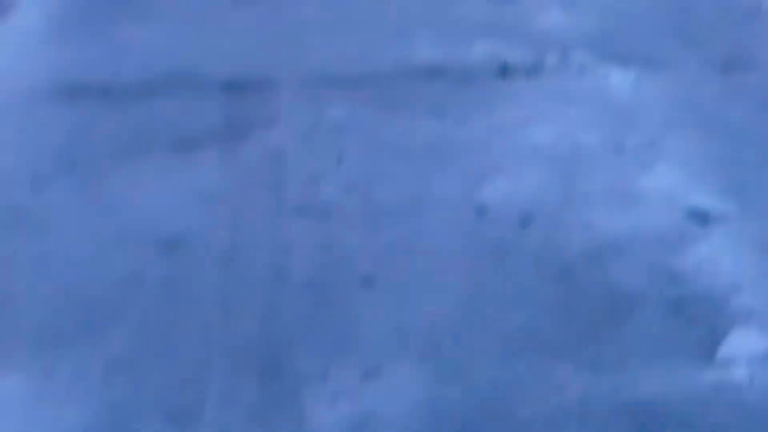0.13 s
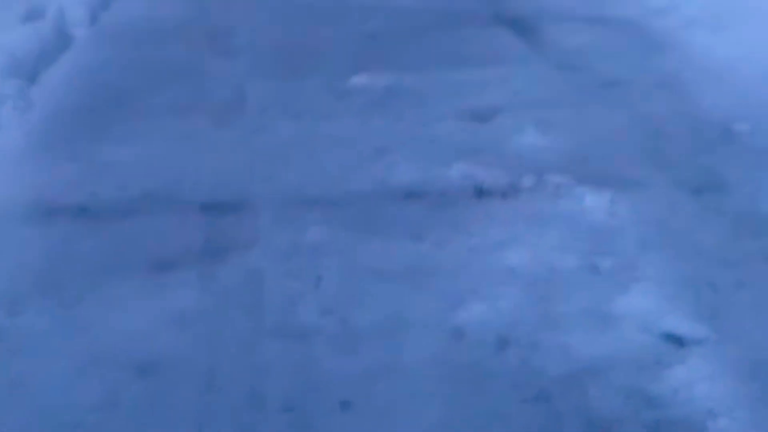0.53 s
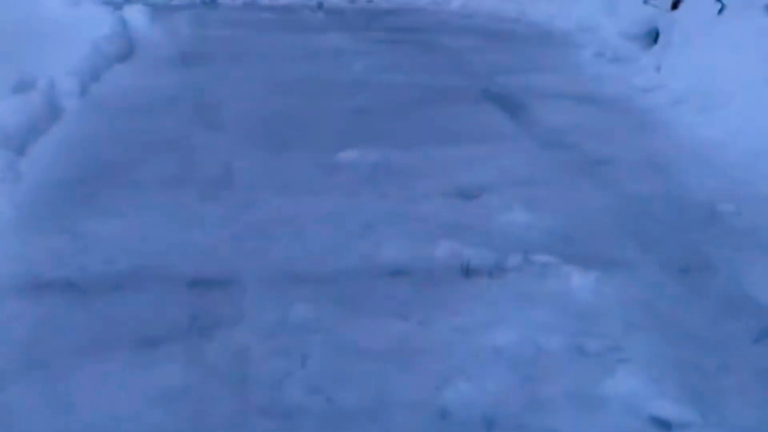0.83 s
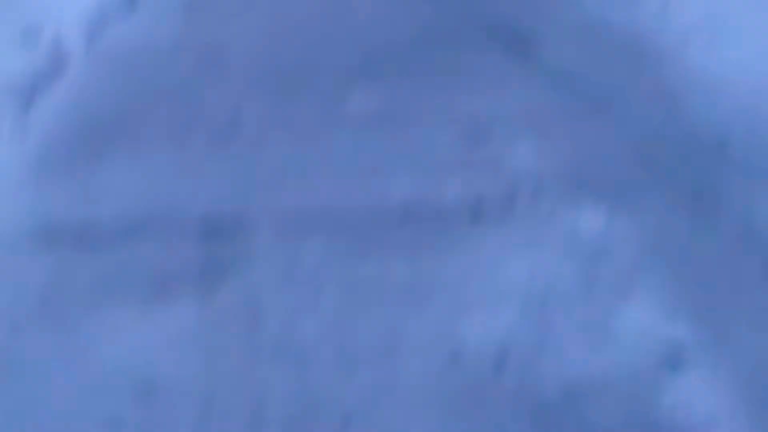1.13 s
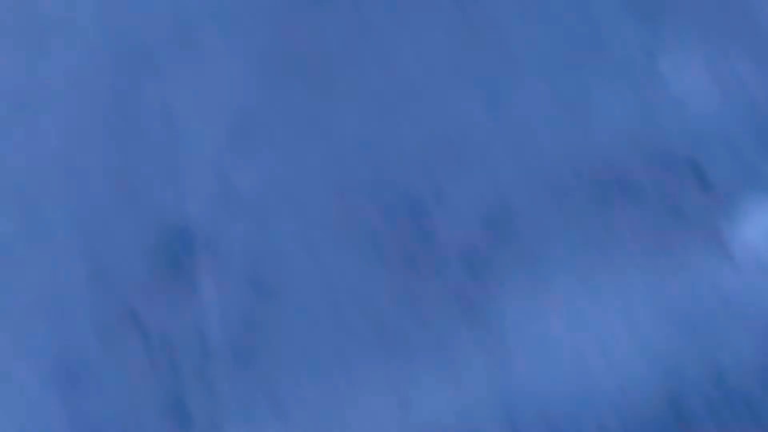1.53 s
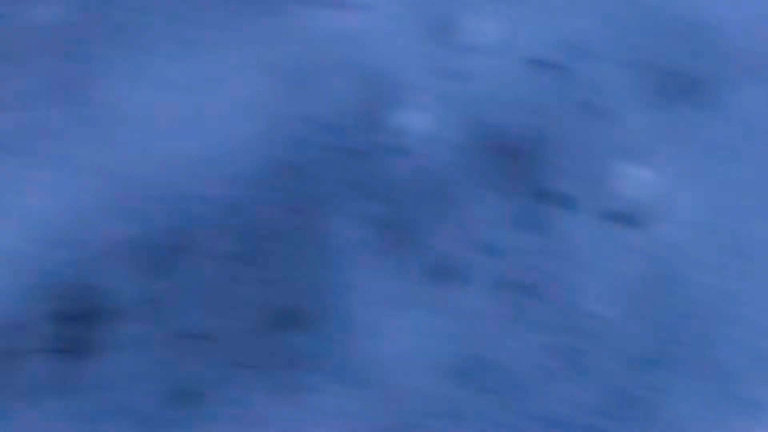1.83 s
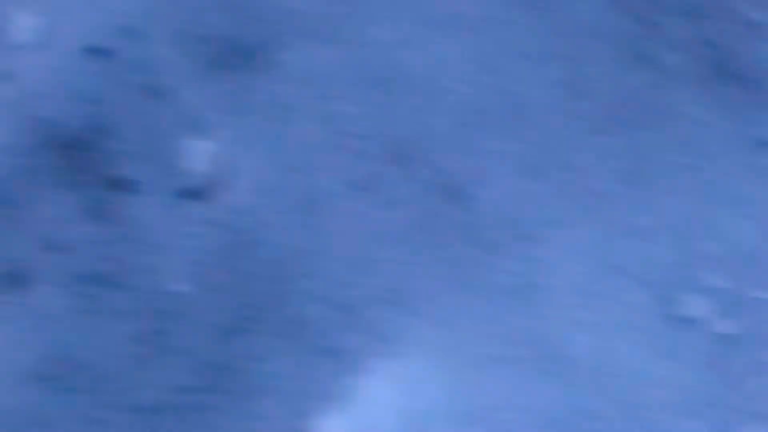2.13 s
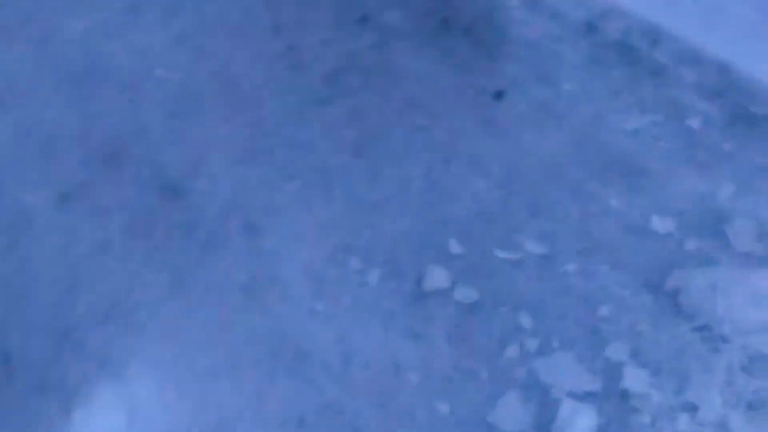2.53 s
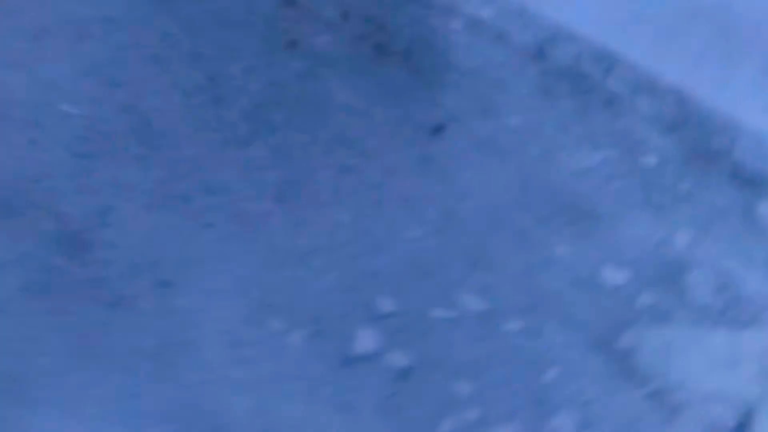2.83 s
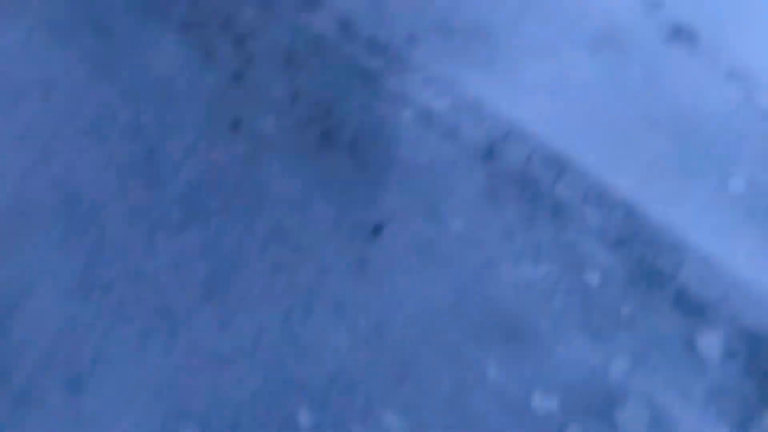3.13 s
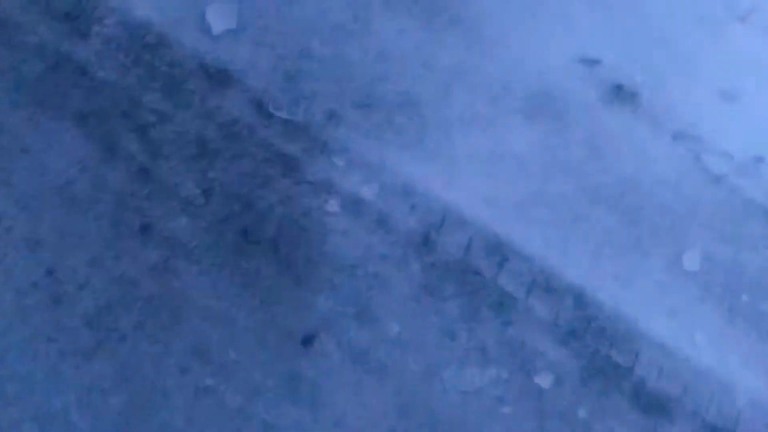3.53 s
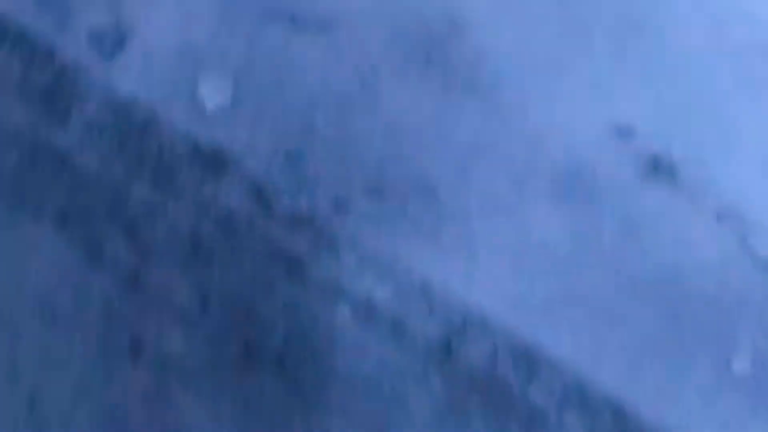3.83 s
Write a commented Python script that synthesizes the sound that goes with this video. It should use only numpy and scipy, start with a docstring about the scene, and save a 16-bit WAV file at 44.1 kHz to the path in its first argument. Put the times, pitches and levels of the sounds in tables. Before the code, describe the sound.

Boots tread on a frozen outdoor path, the crust crackling and crunching underfoot. After a few quiet crackles the steps build, ending with two loud, close cracks. A faint hiss and a few tiny bird chirps sit behind.

```python
"""Footsteps on crusted ice

Boots tread on ice outdoors, ever closer. Each crack launches bending waves in the sheet; these are dispersive,
treble outrunning bass, so it arrives as a tiny falling chirp with a spray of splinters. Crumbs crunch under the
weight, soles scuff and some cracks trail off in a low, falling knock. Small birds call over a faint hiss."""
import sys
import numpy as np
from scipy import signal
from scipy.fft import rfft, irfft, next_fast_len
from scipy.io import wavfile
from scipy.ndimage import map_coordinates

SR = 44100
rng = np.random.default_rng(int(sys.argv[2]) if len(sys.argv) > 2 else 0)


def wrap_up_sound(samples):
    """Save the sound to the file named by the first command line argument, as 16-bit audio."""
    columns = np.atleast_2d(samples).T
    # keep every value between -1 and 1, then stretch to whole-number steps
    tamed = np.clip(columns, -1, 1)
    steps = np.round(tamed * 32767).astype(np.int16)
    wavfile.write(sys.argv[1], SR, steps)


N = 176400
T = np.arange(N) / SR
BURST = 2048  # samples in one short event
LAG_S, ARRIVAL_S = .0047, .0016  # at 1 kHz: travel time through the ice; arrival after a listed time
CLUMPS_PER_S = 220


def amp(db):
    """Decibels expressed as an amplitude ratio."""
    return 10 ** (np.asarray(db) / 20)


def unit(x):
    """Normalisation to an RMS of one."""
    return x / np.sqrt(np.mean(x ** 2) + 1e-20)


def sized(x, seconds):
    """A burst with the energy of so many seconds at unit level."""
    return x / np.linalg.norm(x) * np.sqrt(seconds * SR)


def gain(points, hz):
    """A magnitude response: (Hz, dB) points interpolated in log frequency."""
    f, db = np.transpose(points)
    return amp(np.interp(np.log(hz + 1e-6), np.log(f), db))


def bell(f, hz, width_oct):
    """A resonance peak, Gaussian in log frequency."""
    return np.exp(-.5 * (np.log2((f + 1) / hz) / width_oct) ** 2)


def filtered(x, response):
    """Linear filtering: the spectrum of x times a complex frequency response."""
    m = next_fast_len(2 * len(x))
    return irfft(rfft(x, m) * response(np.fft.rfftfreq(m, 1 / SR)), m)[:len(x)]


def wobble(per_s):
    """Random modulation: a smooth curve through per_s Gaussian values a second."""
    return map_coordinates(rng.standard_normal(int(N * per_s / SR) + 4), [T * per_s])


def add(out, start, x):
    """Superposition of x on out from a start in seconds."""
    i = max(round(start * SR), 0)
    out[i:i + len(x)] += x[:max(N - i, 0)]


def swell(t, length, rise, fall):
    """An envelope with linear attack, hold and exponential decay; times in seconds."""
    return np.clip(t / rise, 0, 1) * np.exp(-np.maximum(t - length, 0) / fall)


def bending(hz, lag_s):
    """Dispersion of bending waves: group delay, lag_s at 1 kHz, goes as one over root frequency."""
    return np.exp(-4j * np.pi * lag_s * np.sqrt(1000 * hz))


def fractures(per_s):
    """A Poisson process of tiny breaks: impulses of uneven size, the strong ones in clumps."""
    size_db = 4 * np.clip(rng.standard_normal(N), -2, 2) + 1.5 * wobble(CLUMPS_PER_S)
    return (rng.random(N) < per_s / SR) * rng.choice([-1, 1], N) * amp(size_db)


def grains(per_s, spectrum):
    """Many tiny fractures, dispersed by their passage through the ice, at unit level."""
    return unit(filtered(fractures(per_s), lambda f: gain(spectrum, f) * bending(f, LAG_S)))


def echo(x, t60_s):
    """Diffuse reflection from the surroundings: convolution with exponentially decaying noise."""
    t = T[:SR]
    tail = rng.standard_normal(SR) * amp(-60 * t / t60_s) * (1 - np.exp(-t / .01))
    return signal.fftconvolve(x, tail / np.linalg.norm(tail))[:N]


def air():
    """Ambient noise: a faint broadband rumble and hiss whose level wavers slightly."""
    # Each row: frequency in Hz, relative level in dB.
    spectrum = [(25, -26.5), (48, -1.5), (90, 1), (170, -1.5), (300, -6.5), (600, -14.5), (1200, -20.5),
                (2500, -29), (3300, -13.5), (4600, -18.5), (6000, -35), (9000, -36.5), (16000, -40.5)]
    level = amp(-64.5 + .49 * wobble(per_s=5.2))
    return level * unit(filtered(rng.standard_normal(N), lambda f: gain(spectrum, f)))


def birds():
    """Short frequency-modulated whistles; scattering by branches makes them flutter."""
    # Each row: start and length in seconds, first and last pitch in Hz, direct level in dB.
    notes = [(0.811, 0.06, 5620, 7630, -63.5), (0.851, 0.038, 5570, 8020, -55.5),
             (.0, 0.049, 2040, 1820, -67), (0.186, 0.088, 4080, 3580, -79), (0.61, 0.062, 4420, 3740, -70),
             (.665, 0.048, 3350, 3080, -73), (1.258, 0.04, 4660, 3740, -65.5),
             (1.297, 0.05, 3850, 3070, -60.5), (1.543, 0.085, 5350, 4930, -68),
             (2.105, 0.066, 3000, 3380, -60), (3.075, 0.067, 4200, 3950, -61),
             (3.146, 0.035, 3590, 3170, -57.5), (1.285, 0.0282, 2960, 3780, -63.5)]
    direct, far = np.zeros(N), np.zeros(N)
    warble = 1 + .017 * wobble(per_s=250)
    for start, length, first_hz, last_hz, db in notes:
        progress = np.clip((T - start) / length, 0, 1)
        hz = first_hz * (last_hz / first_hz) ** progress * warble
        note = np.sqrt(2) * np.sin(np.pi * progress) * np.sin(2 * np.pi * np.cumsum(hz) / SR)
        direct += amp(db) * note
        far += amp(-66.5) * note  # the diffuse field is equally loud for near and far birds
    flutter = unit(amp(3.5 * wobble(per_s=200)))
    return direct * flutter + echo(far, t60_s=.44)


def thumps():
    """A damped impact: weight landing on the heel gives a dull pulse of low noise."""
    # Each row: start in seconds, level in dB.
    landings = [(1.892, -52.5), (2.953, -50), (3.803, -70)]
    # Each row: frequency in Hz, relative level in dB.
    spectrum = [(20, -9.5), (55, 2.5), (110, 3.5), (250, -27.5), (800, -43)]
    weight = sum(amp(db) * swell(T - start, 0, rise=.002, fall=.041) for start, db in landings)
    return weight * unit(filtered(rng.standard_normal(N), lambda f: gain(spectrum, f)))


def chips():
    """Free vibration: chips snap off at random, each a damped sinusoid with a pitch of its own."""
    per_s, centre_hz, spread_oct, spread_db, decay_cycles = 260, 4550, .55, 5, 1.6
    when, size, pitch = rng.random((int(per_s * N / SR), 3)).T
    hz = centre_hz * 2 ** (spread_oct * np.sqrt(3) * (2 * pitch - 1))
    cycles = hz[:, None] * T[:BURST // 8]
    level = amp(-spread_db * np.log(size + .03))
    pings = level[:, None] * np.sin(2 * np.pi * cycles) * np.exp(-cycles / decay_cycles)
    samples = (when * N).astype(int)[:, None] + np.arange(cycles.shape[1])
    return unit(np.bincount(samples.ravel(), pings.ravel(), N)[:N])


def scuff():
    """Sliding friction: the sole rolls crumbs, hisses over frost and, under pressure, breaks off chips."""
    # Each row: time in seconds, crumb level in dB, hiss level in dB.
    slide = [(0, -70, -65.5), (.2, -83, -70.5), (1.1, -84, -70), (1.5, -68.5, -61.5), (1.8, -60, -60.5),
             (2.0, -67, -62), (2.29, -62, -61.5), (2.34, -44, -53), (2.45, -62, -58), (2.6, -56, -55),
             (2.92, -49, -52.5), (3.08, -51, -59), (3.14, -62.5, -56), (3.22, -53.5, -56),
             (3.35, -65, -63.5), (3.49, -74.5, -64), (3.67, -58, -61.5), (3.75, -63, -55), (4, -51, -58.5)]
    # Each row of both spectra: frequency in Hz, relative level in dB.
    crumb_spectrum = [(60, -22), (200, -2.5), (400, -5.5), (700, -2), (1200, -6), (2000, -10), (3500, -23),
                      (9000, -41)]
    hiss_spectrum = [(500, -7), (1400, 1.5), (2400, -0.5), (4000, 2.5), (5500, -0.5), (7000, -5.5),
                     (10000, -11.5), (16000, -14)]
    bite_db = -50.5  # hiss level at which the sole chips as loudly as it slides
    times, *levels_db = np.transpose(slide)
    crumb, hiss = [amp(np.interp(T, times, db)) for db in levels_db]
    frost = fractures(per_s=7000) * amp(1.06 * wobble(CLUMPS_PER_S))
    treble = unit(filtered(frost, lambda f: gain(hiss_spectrum, f))) + hiss / amp(bite_db) * chips()
    return crumb * grains(per_s=500, spectrum=crumb_spectrum) + hiss * treble


def rasps():
    """Resonance excited by friction: a hard edge scrapes briefly across the ice and rings a shard."""
    # Each row: start and length in seconds, level in dB, resonance in Hz, its boost in dB.
    scrapes = [(0.098, 0.0054, -39, 2570, 15), (2.49, 0.01, -32.5, 6930, 12),
               (2.6605, 0.0032, -29.5, 3660, 10.5), (3.014, 0.0066, -34.5, 6500, 10),
               (3.127, .004, -50, 10500, 14), (3.583, 0.0022, -31.5, 2930, 21),
               (3.834, 0.01, -26.5, 1370, 25)]
    # Each row: frequency in Hz, relative level in dB.
    spectrum = [(300, -0.5), (1300, 4), (3000, -1), (7000, -3.5), (11000, -10.5), (16000, -18.5)]
    out, t = np.zeros(N), T[:BURST]
    for start, length, db, hz, ring_db in scrapes:
        colour = lambda f: gain(spectrum, f) * amp(ring_db * bell(f, hz, width_oct=.34))
        scrape = unit(filtered(rng.standard_normal(BURST), colour))
        add(out, start, amp(db) * scrape * swell(t, length, rise=.0015, fall=.0025))
    return out


def crunch():
    """Brittle failure: coarse crumbs, fine grit and chips break off as the crust yields to the boot."""
    # Each row: start and length in seconds, relative crumb and grit levels in dB.
    collapses = [(0.086, 0.034, -53, -54.5), (0.402, 0.026, -65.5, -61.5), (1.622, 0.037, -54.5, -53.5),
                 (1.867, 0.031, -45, -46), (1.895, 0.04, -53.5, -48), (2.318, 0.031, -41.5, -47.5),
                 (2.362, 0.055, -46, -50.5), (2.426, 0.047, -50.5, -57), (2.631, 0.098, -52.5, -54.5),
                 (2.9, 0.051, -52, -48.5), (2.943, 0.044, -37, -39), (2.994, 0.047, -35, -38),
                 (3.045, 0.022, -40, -43.5), (3.502, 0.054, -47.5, -54), (3.575, 0.02, -39, -52),
                 (3.702, 0.085, -43, -55.5), (3.794, 0.043, -34, -40), (3.862, 0.016, -59, -42.5),
                 (3.885, 0.014, -39, -38.5), (3.908, 0.034, -52, -48.5)]
    # Each row of both spectra: frequency in Hz, relative level in dB.
    crumb_spectrum = [(40, -24), (130, -18.5), (250, -5), (450, -3), (750, -4.5), (1200, -6.5), (2000, -14),
                      (3500, -19), (9000, -34)]
    grit_spectrum = [(400, -21.5), (1500, 6.5), (3000, -4.5), (4200, 3), (7000, 0), (9500, -7.5),
                     (13000, -15), (16000, -8)]
    crumb, grit = np.zeros(N), np.zeros(N)
    for start, length, crumb_db, grit_db in collapses:
        load = swell(T - start, length, rise=.14 * length, fall=.0076)
        crumb = np.hypot(crumb, amp(crumb_db) * load)  # incoherent sources add in power
        grit = np.hypot(grit, amp(grit_db) * load)
    coarse = grains(per_s=650, spectrum=crumb_spectrum)
    fine = amp(-1.5) * grains(per_s=2200, spectrum=grit_spectrum) + amp(-3) * chips()
    return crumb * coarse + grit * fine


def knocks():
    """Dispersion: the low end of some cracks, a band around a pitch, is drawn out into a hollow, falling knock."""
    # Each row: time in seconds, level in dB, pitch in Hz.
    tails = [(2.3263, -41.5, 292), (2.9515, -8.5, 688), (3.5438, -35, 276), (3.7993, -26, 278),
             (3.8209, -26, 273)]
    out, impulse = np.zeros(N), signal.unit_impulse(BURST)
    for time, db, hz in tails:
        knock = filtered(impulse, lambda f: bell(f, hz, width_oct=.49) * bending(f, LAG_S))
        add(out, time + ARRIVAL_S - LAG_S, amp(db) * sized(knock, seconds=.004))
    return out


def cracks():
    """Dispersion in a plate turns each crack into a falling chirp, with splinters and a short rattle."""
    # Each row: time in seconds, relative body and splinter levels in dB, pitch of the plate in Hz.
    breaks = [(0.0418, -71, -49, 2070), (0.1038, -38.5, -56, 1560), (0.112, -54, -55, 1110),
              (0.1508, -52.5, -53, 2250), (0.271, -51.5, -36, 1780), (0.419, -64, -51, 1580),
              (0.4654, -59.5, -52.5, 1370), (0.512, -62, -52, 1100), (0.659, -61, -60, 1200),
              (1.181, -58, -58.5, 1130), (1.6354, -31, -40.5, 820), (1.669, -45.5, -43.5, 1210),
              (1.7834, -47, -47.5, 1710), (1.8274, -57, -52, 1740), (1.844, -45, -38.5, 1490),
              (1.871, -34, -39, 1080), (1.8766, -33.5, -32, 1100), (1.8931, -33, -33, 1080),
              (1.9139, -44.5, -37, 1240), (2.225, -43, -43, 1060), (2.2759, -40.5, -45, 960),
              (2.3207, -42, -44, 1370), (2.3284, -33.5, -34.5, 610), (2.338, -45.5, -33.5, 1280),
              (2.3436, -38.5, -32, 1040), (2.3596, -39, -59, 1000), (2.3708, -40, -37, 567),
              (2.3954, -34.5, -35.5, 600), (2.411, -38.5, -38, 646), (2.437, -42, -35.5, 580),
              (2.452, -50, -44, 1050), (2.461, -40.5, -44, 765), (2.4864, -70, -43, 1838),
              (2.4929, -35, -30, 1020), (2.5889, -37.5, -36.5, 1500), (2.6615, -34, -32.5, 685),
              (2.6752, -38, -30, 1590), (2.699, -49, -43.5, 900), (2.764, -45.5, -41, 720),
              (2.848, -47, -47, 755), (2.8677, -40.5, -37.5, 910), (2.879, -39, -35.5, 900),
              (2.9246, -35, -48, 1760), (2.9329, -33, -31.5, 1010), (2.9506, -14.5, -21, 1120),
              (2.959, -28.5, -39, 960), (2.977, -32.5, -49, 1200), (2.9934, -27, -46, 795),
              (3.0012, -29, -40, 1204), (3.0111, -26, -36.5, 740), (3.0192, -32.5, -28.5, 1050),
              (3.0291, -24, -42, 1240), (3.0754, -39.5, -45, 1310), (3.0842, -47, -51, 1103),
              (3.1144, -41, -46.5, 1410), (3.425, -61, -46.5, 1530), (3.5121, -32.5, -32.5, 1080),
              (3.5167, -32, -33.5, 875), (3.5384, -32, -36, 1060), (3.5434, -29, -31.5, 1210),
              (3.5851, -28.5, -34, 1130), (3.6066, -43, -40.5, 1160), (3.6165, -36.5, -42, 910),
              (3.6959, -26, -41, 1040), (3.71, -35, -60, 990), (3.7243, -36, -35.5, 980),
              (3.7413, -32, -33, 1390), (3.789, -35, -30.5, 1760), (3.7998, -13, -23.5, 690),
              (3.8047, -17.5, -31, 900), (3.814, -27, -45, 810), (3.8213, -18, -24.5, 1150),
              (3.8304, -19.3, -30, 1000), (3.8422, -24, -29.5, 1220), (3.8533, -31.0, -46, 1350),
              (3.8761, -35, -52, 1190), (3.8909, -26, -35, 760), (3.9032, -33, -35, 1140),
              (3.9077, -26, -49, 1020), (3.962, -34.5, -52, 1050), (3.99, -20, -42, 1180)]
    # Each row: frequency as a multiple of the plate's pitch, relative level in dB.
    plate_spectrum = [(.1, -36), (.25, -20), (.5, -7), (1, 1), (1.5, -8.5), (2.3, -17.5), (4, -31.5),
                      (12, -56)]
    # Each row: frequency in Hz, relative level in dB.
    splinter_spectrum = [(300, -3.5), (1200, -6.5), (2200, -3.5), (3200, 4), (4300, 2), (7000, -2),
                         (10000, -11.5), (16000, -24)]
    out, t = np.zeros(N), T[:BURST]
    spray_envelope = swell(t - .0007, length=.00031, rise=.00031, fall=.00097)
    for time, body_db, splinter_db, hz in breaks:
        lag = LAG_S * np.exp(.152 * rng.standard_normal())
        rattle = rng.standard_normal(BURST) * np.exp(-t / .004)  # the broken plate settles
        force = signal.unit_impulse(BURST) + amp(-7) * sized(rattle, seconds=1 / SR)
        phase = np.exp(2j * np.pi * rng.random())
        body = filtered(force, lambda f: gain(plate_spectrum, f / hz) * bending(f, lag) * phase)
        body = amp(body_db) * sized(body, seconds=.004)
        spray = rng.standard_normal(BURST) * spray_envelope
        spray = filtered(spray, lambda f: gain(splinter_spectrum, f) * bending(f, lag))
        spray = amp(splinter_db - 2.35) * sized(spray, seconds=.002)
        add(out, time + ARRIVAL_S - lag, body + spray)
    return out


def scene():
    """Superposition of the steps, their faint reverberation, the birds and the air, in one channel."""
    steps = cracks() + crunch() + scuff() + rasps() + thumps() + knocks()
    return (steps + amp(-27.5) * echo(steps, t60_s=.29) + birds() + air())[None]


def record(dry):
    """Band limiting: an ideal low-pass filter removes everything above 16 kHz."""
    return filtered(dry[0], lambda hz: hz < 16000)[None]


dry = scene()
out = record(dry)
wrap_up_sound(out)
```